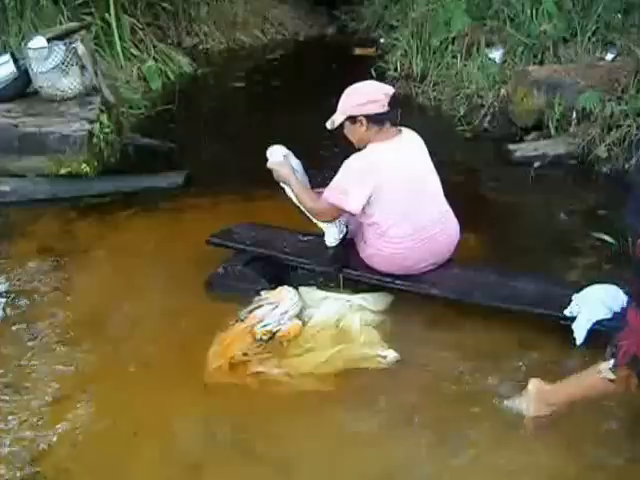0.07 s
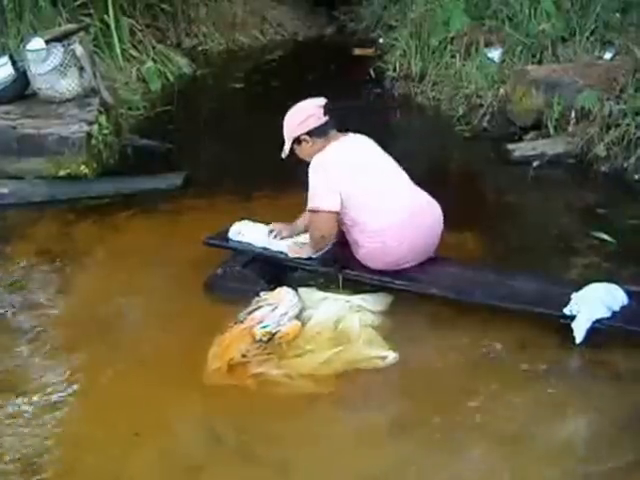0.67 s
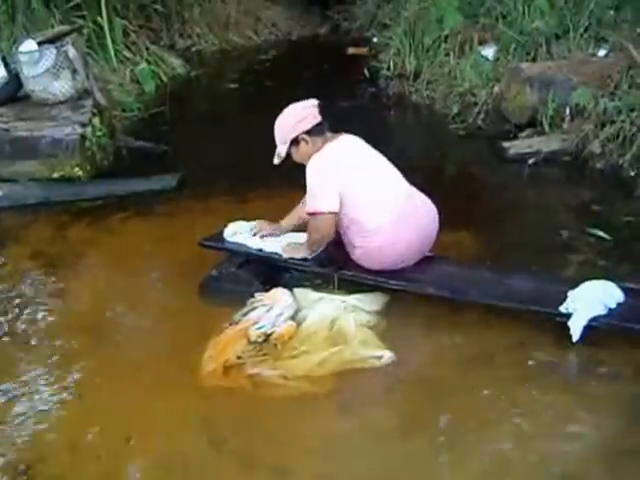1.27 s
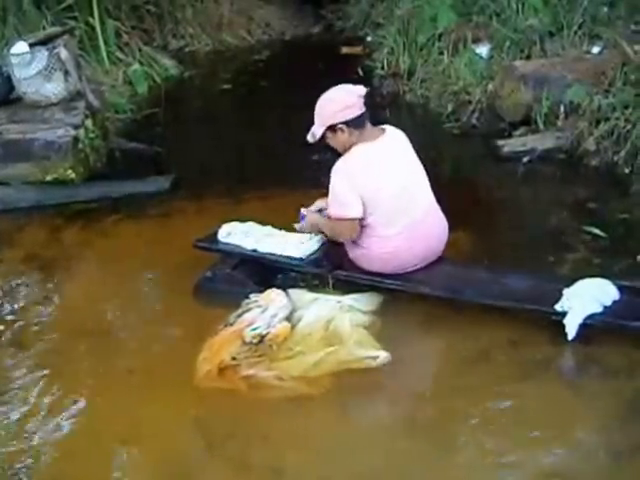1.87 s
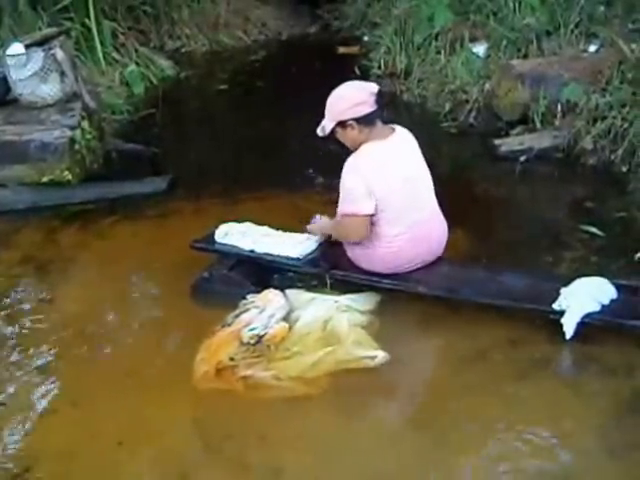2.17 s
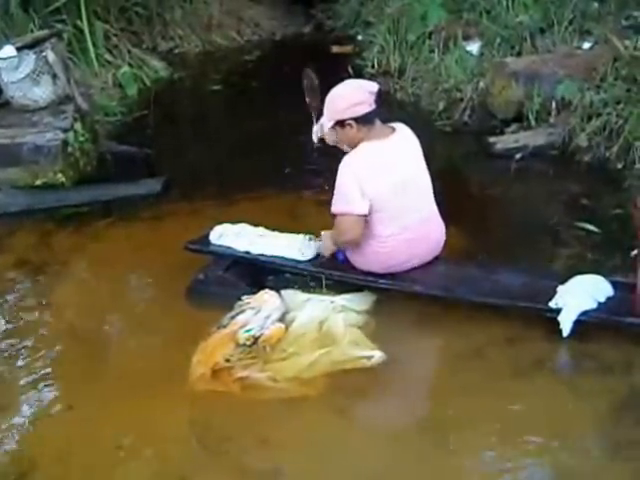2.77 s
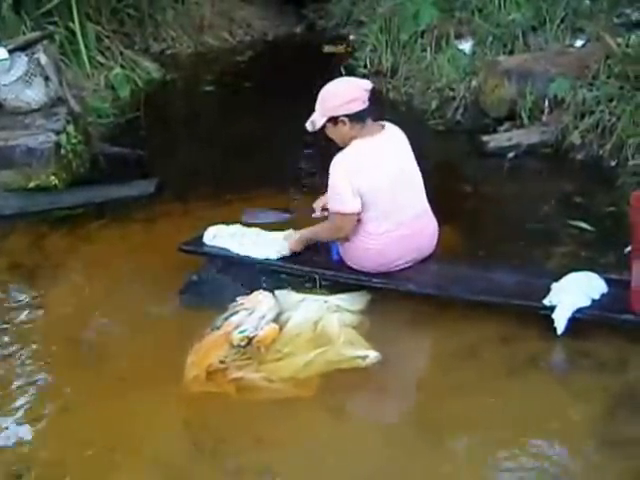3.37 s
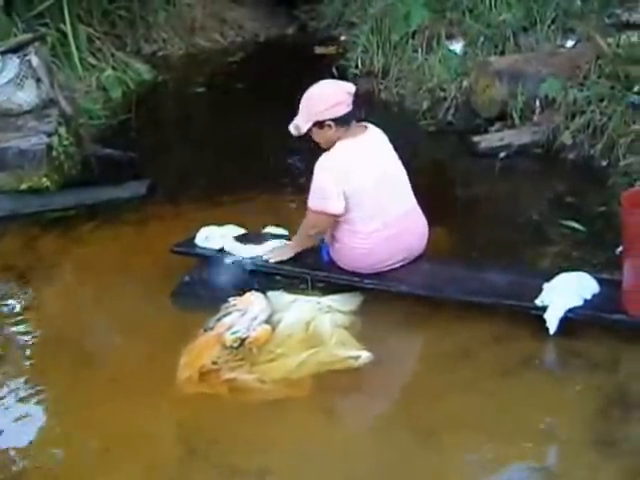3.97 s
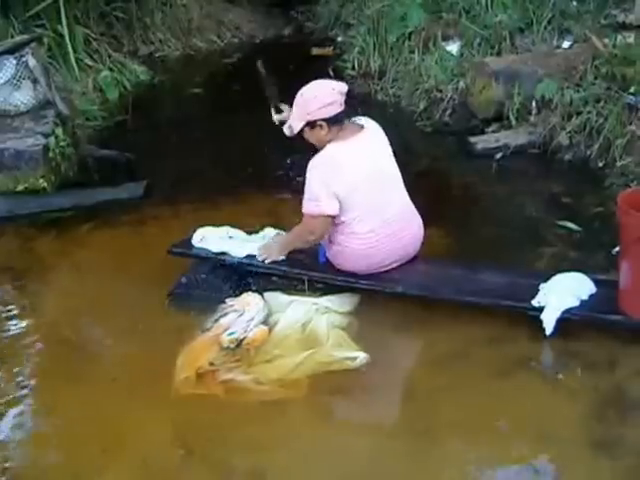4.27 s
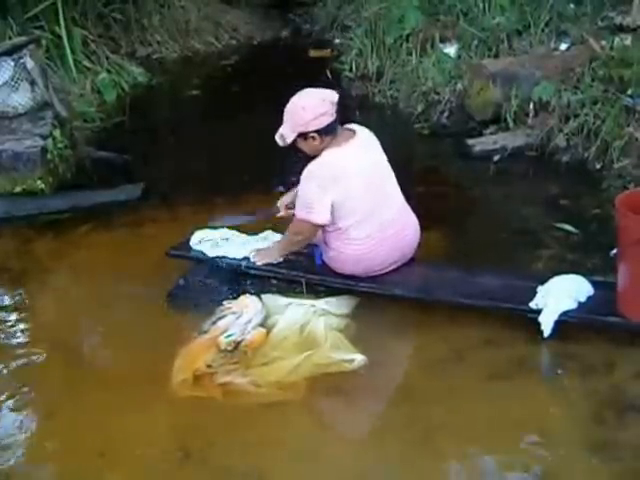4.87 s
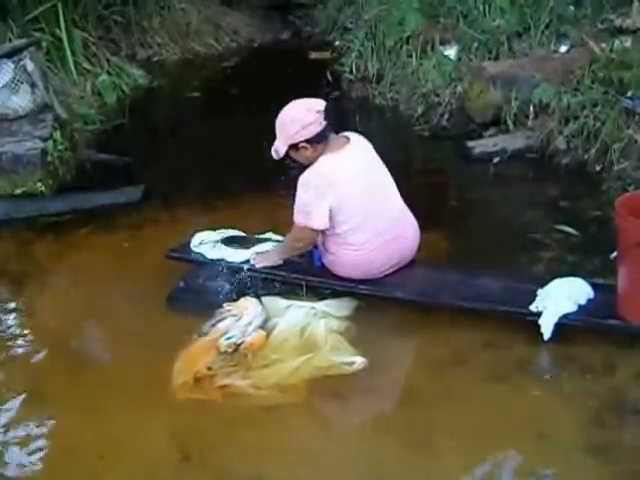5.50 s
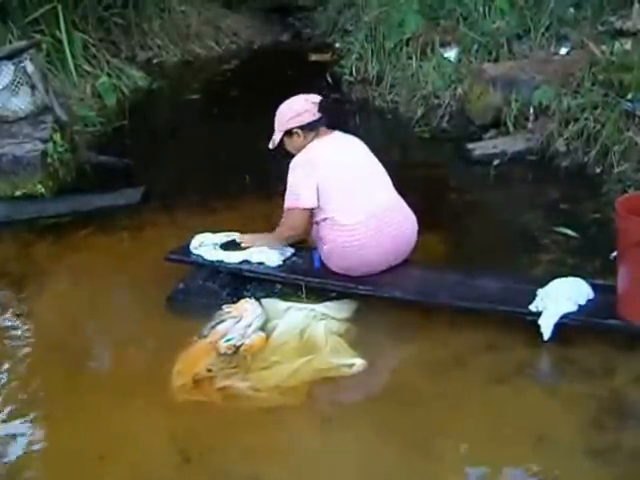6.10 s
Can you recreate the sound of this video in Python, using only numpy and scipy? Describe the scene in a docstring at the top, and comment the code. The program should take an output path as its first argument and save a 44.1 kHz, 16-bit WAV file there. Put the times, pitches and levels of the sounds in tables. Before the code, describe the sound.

Outdoors at a quietly running stream, water plinks and bubbles while wet laundry is slapped down and pressed on a plank. After a lull and a light wooden knock, a paddle beats the cloth four times at an even pace, the second blow weaker, with briefly ringing wood, spatter and a short echo off the banks. The lo-fi microphone distorts on the loud blows and catches faint wind rumble.

```python
"""A wooden paddle whacks wet cloth four times on a plank over a shallow stream: thump, crack, ringing wood
and spray. Before that, the cloth is laid down and kneaded with wet slaps and soft thuds, stirred water
bubbles, and the paddle knocks as it is picked up. The banks scatter each blow back, and a breeze nudges
the microphone of a small camera, whose gritty 8 kHz sound track overloads on the blows."""
import sys
import numpy as np
from scipy import signal
from scipy.fft import rfft, irfft
from scipy.io import wavfile

SR = 44100
rng = np.random.default_rng(int(sys.argv[2]) if len(sys.argv) > 2 else 0)


def store_wav(level_fs):
    """Save 16-bit WAV to argv[1]."""
    pcm = np.round(np.clip(np.atleast_2d(level_fs), -1, 1) * 32767)
    wavfile.write(sys.argv[1], SR, pcm.T.astype(np.int16))


N = 270774
TIME = np.arange(N) / SR
AGE = TIME[:SR // 2]   # time since the start of one event

# Table levels are relative: each layer adds its own shaping and trim.
# tone of the rushing stream: freq_hz, level_db
STREAM_SPECTRUM = [(35, -53), (60, -27), (75, -6), (102, -6), (184, -6), (314, -0.5), (393, -1),
                   (518, -3.5), (585, -6.5), (797, -3.5), (1050, -11), (3010, -13.5), (3700, -12),
                   (4810, -12), (8140, -120)]
# hands and feet stir the water: full_strength_at_s, hold_s, level_db
WATER_STIRS = [(.01, 0.095, -51.5), (.36, 0.11, -47), (.6, 0.2, -57.5), (1.2, .03, -45.5),
               (1.44, 0.051, -53.5), (2.04, 0.033, -56)]
# tone of tiny wet contacts, as coloured by the microphone: freq_hz, level_db
WET_SPECTRUM = [(150, 10), (500, -0.5), (950, 1.5), (1600, -16), (2400, -7), (3800, -11.5)]
# slaps of cloth and water: start_s, level_db, low_cut_hz, t60_s
WET_SLAPS = [(.064, -34, 1500, 0.03), (.143, -34.5, 700, 0.032), (0.397, -37.5, 252, 0.25),
             (.4340, -21, 182, 0.078), (.692, -40, 1100, 0.088), (.746, -34.5, 2500, 0.037),
             (1.004, -32, 920, 0.054), (5.319, -29, 597, 0.088), (5.623, -30.5, 545, 0.084)]
# the clearest bubbles: start_s, level_db, start_pitch_hz, t60_s
CLEAR_BUBBLES = [(.143, -32, 1150, 0.028), (.852, -32, 476, 0.072), (.879, -36, 2150, .038),
                 (.8924, -21, 2240, 0.012), (.894, -38, 718, 0.12), (1.005, -22, 1000, 0.024),
                 (1.006, -27.5, 1460, 0.015), (1.184, -37.5, 1014, 0.17), (1.192, -35, 1460, 0.031),
                 (1.203, -31.5, 748, 0.073), (1.215, -34.5, 1765, 0.062), (1.218, -35, 1030, 0.044),
                 (1.246, -33.5, 754, 0.056), (1.353, -38.5, 985, 0.047), (2.058, -39, 2050, 0.043)]
# cloth and hands land on the plank: start_s, level_db
SOFT_THUDS = [(0.404, -50), (0.434, -23.5), (.697, -35.5), (3.870, -34), (5.625, -27)]
# ringing modes of the plank: pitch_hz, level_db, t60_s
PLANK_MODES = [(144, -10.5, 0.067), (228, -1.5, 0.052), (311, -5, 0.042), (467.5, 3, 0.04),
               (615, -4.5, 0.055), (2204, -22.5, 0.049)]
# gusts at the microphone: full_strength_at_s, hold_s, level_db
BREEZE_GUSTS = [(0.573, .25, -49), (1.123, 0.39, -51), (4.352, 0.12, -44.5), (5.014, 0.292, -38.5),
                (5.8, .13, -44.5)]
# stronger eddies buffet the microphone: start_s, level_db, pitch_hz
EDDY_PUFFS = [(.636, -34, 44.7), (1.145, -36.5, 50.5), (1.24, -39, 44.6), (5.100, -32.5, 122),
              (5.136, -28, 40), (5.194, -29.5, 152)]
# light knocks of the paddle: start_s, level_db
PADDLE_KNOCKS = [(2.8574, -20), (2.8625, -17.5), (2.948, -33)]
# ringing modes of the paddle: pitch_hz, level_db, t60_s
PADDLE_MODES = [(381, -2, 0.035), (696, -4, 0.03), (879.6, -2, 0.037), (1027, -11, 0.031),
                (1900, -16, 0.048)]
# tone of the blade's contact, as heard: freq_hz, level_db
CRACK_SPECTRUM = [(150, -13), (400, 1.5), (900, 5), (1500, -12), (2400, 1.5), (3800, -13.5)]
# blows on the cloth: start_s, thump_db, thump_hz, crack_db, plank_db, paddle_db, spray_db
PADDLE_BLOWS = [(3.3852, 8.5, 303.5, -3, -4, -8, -19), (4.1378, -7.5, 200, -9, -31, -6, -27.5),
                (4.889, 10, 278.5, -5, -2.5, -3, -19.5), (5.6530, 6.5, 290, -8, -3.5, -1, -17.5)]
# tone of flying spray, as heard: freq_hz, level_db
SPRAY_SPECTRUM = [(100, 0.5), (300, -2), (600, -0.5), (900, 4.5), (1400, -11.5), (2400, -9), (3800, -8.5)]

RUNOFF_DB, TRICKLE_DB = -54, -61   # water shed at each blow; the trickle that never stops
BUBBLE_CLIMB_HZ_PER_S = 10200
CALM_DB = -55.5   # the breeze between gusts
SQUASH_S = .0075   # time the blade takes to flatten the cloth
TRACK_HZ, ANTIALIAS_HZ, CUTOFF_HZ, CLIP_LEVEL = 8000, 3750, 15600, .7


def from_db(db):
    """Decibels to gain."""
    return 10 ** (np.asarray(db) / 20)


def rms_one(x):
    """Scale to unit rms."""
    return x / np.sqrt(np.mean(x ** 2) + 1e-20)


def fade(t60):
    """Decay by 60 dB in t60 seconds; 1 - fade makes a soft attack."""
    return from_db(-60 * AGE / t60)


def swell(peak_s):
    """Rises to 1 at peak_s, then dies away."""
    return AGE / peak_s * np.exp(1 - AGE / peak_s)


def surge(s, hold_s, db, rise_db_per_s, fall_db_per_s):
    """Gain that climbs to db at time s, holds, then falls away."""
    before_s, after_s = np.maximum(s - TIME, 0), np.maximum(TIME - s - hold_s, 0)
    return from_db(db - rise_db_per_s * before_s - fall_db_per_s * after_s)


def add(track, s, sound):
    """Mix a sound into the track at time s."""
    at = round(s * SR)
    track[at:at + len(sound)] += sound[:N - at]


def cut(x, hz, kind, order=2):
    """Butterworth low- or high-pass."""
    return signal.sosfilt(signal.butter(order, hz, kind, fs=SR, output="sos"), x)


def coloured(x, spectrum):
    """EQ noise to a spectrum, with nothing above the sound track's band; rms 1."""
    hz = np.fft.rfftfreq(len(x), 1 / SR)
    at_hz, db = np.transpose(spectrum)
    gain = from_db(np.interp(np.log(hz + 1), np.log(at_hz), db)) * (hz < TRACK_HZ / 2)
    return rms_one(irfft(rfft(x) * gain, len(x)))


def grains(per_s, spread_db, size=len(AGE)):
    """Random clicks of uneven size."""
    clicks = (rng.random(size) < per_s / SR) * rng.standard_normal(size)
    return clicks * from_db(spread_db * rng.standard_normal(size))


def struck(modes, scatter_db):
    """Modes ring with strengths that depend on where the wood is hit."""
    ring = np.zeros(len(AGE))
    for k, (hz, db, t60) in enumerate(modes):
        strength = (-1) ** k * from_db(db + scatter_db * rng.standard_normal())
        ring += strength * np.sin(2 * np.pi * hz * AGE) * fade(t60)
    return ring


def stream():
    """Shallow running water lays a quiet, steady rush under everything."""
    return from_db(-50) * coloured(rng.standard_normal(N), STREAM_SPECTRUM)


def stirring():
    """Water wakes fast at each stroke or blow, then slowly settles to a trickle."""
    strokes = list(WATER_STIRS) + [(s, 0, RUNOFF_DB) for s, *_ in PADDLE_BLOWS]
    power = sum(surge(*stroke, rise_db_per_s=300, fall_db_per_s=64) ** 2 for stroke in strokes)
    return np.sqrt(power + from_db(TRICKLE_DB) ** 2)


def bubble(hz, t60):
    """A bubble rings and climbs in pitch, by an octave at most, as it nears the surface."""
    pitch_hz = np.minimum(hz + BUBBLE_CLIMB_HZ_PER_S * AGE, 2 * hz)
    return np.sin(2 * np.pi * np.cumsum(pitch_hz) / SR) * fade(t60) * (1 - fade(t60=0.0024))


def water():
    """A few clear bubbles over the fizz and small plinks of stirred water."""
    bubbles, plinks = np.zeros(N), np.zeros(N)
    for s, db, hz, t60 in CLEAR_BUBBLES:
        add(bubbles, s, from_db(db) * bubble(hz, t60))
    for hz in np.geomspace(700, 3600, num=16):
        plink = bubble(hz, t60=40 / hz)   # small bubbles die sooner
        plinks += signal.fftconvolve(grains(per_s=14, spread_db=5.5, size=N), plink)[:N]
    fizz = cut(coloured(grains(per_s=3500, spread_db=1, size=N), WET_SPECTRUM), 1190, "high")
    return bubbles + stirring() * (from_db(-4) * rms_one(plinks) + from_db(0.5) * rms_one(fizz))


def banks(x):
    """Rocks and leafy banks scatter sound back as a short, dense echo with little bass."""
    tail = rng.standard_normal(len(AGE)) * fade(t60=0.17) * (1 - fade(t60=0.081))
    echo = signal.fftconvolve(x, tail / np.linalg.norm(tail))[:N]
    return from_db(-15) * cut(echo, 330, "high")


def slaps():
    """Each slap is a quick burst of tiny wet contacts; small ones lack the lows."""
    out = np.zeros(N)
    for s, db, low_cut_hz, t60 in WET_SLAPS:
        contacts = coloured(grains(per_s=11000, spread_db=2.5), WET_SPECTRUM)
        burst = rms_one(cut(contacts, low_cut_hz, "high"))
        add(out, s, from_db(db + 1) * burst * fade(t60) * (1 - fade(t60=0.01)))
    return out


def thuds():
    """Cloth and hands land softly and set the plank ringing quietly."""
    out = np.zeros(N)
    for s, db in SOFT_THUDS:
        add(out, s, from_db(db) * struck(PLANK_MODES, scatter_db=0.5) * (1 - fade(t60=0.023)))
    return out


def breeze():
    """Eddies bump against the microphone in an uneven rumble; stronger gusts add faster flutter."""
    gusts = [surge(*gust, rise_db_per_s=260, fall_db_per_s=240) for gust in BREEZE_GUSTS]
    gust_db = 20 * np.log10(np.maximum(np.max(gusts, axis=0), from_db(CALM_DB)))
    rumble = rms_one(cut(cut(rng.standard_normal(N), 40.8, "low"), 23.6, "high"))
    flutter = rms_one(cut(cut(rng.standard_normal(N), 204, "low", order=4), 51, "high"))
    flutter_db = np.minimum(1.3 * (gust_db + 33), 0)
    wobble = rms_one(cut(rng.standard_normal(N), 18, "low"))
    eddies = rms_one(from_db(5 * np.tanh(wobble)))
    return from_db(gust_db) * eddies * (rumble + from_db(flutter_db) * flutter)


def puffs():
    """A single eddy pushes and pulls the diaphragm once or twice."""
    out = np.zeros(N)
    for s, db, hz in EDDY_PUFFS:
        add(out, s, from_db(db) * np.sin(2 * np.pi * hz * AGE) * swell(peak_s=0.0066) ** 2)
    return out


def knocks():
    """The paddle bumps as it is lifted and handled; a soft contact favours its lowest mode."""
    out = np.zeros(N)
    for s, db in PADDLE_KNOCKS:
        ring = cut(struck(PADDLE_MODES, scatter_db=0), 940, "low", order=1)
        tick = coloured(rng.standard_normal(len(AGE)), CRACK_SPECTRUM) * fade(t60=0.039)
        add(out, s, from_db(db) * (ring + from_db(-21) * tick))
    return out


def blows():
    """The blade cracks on the wet cloth, drives the air out of it, shakes the wood and throws spray."""
    out = np.zeros(N)
    for s, thump_db, thump_hz, crack_db, plank_db, paddle_db, spray_db in PADDLE_BLOWS:
        # the flat blade's air pulse swings only a few times
        thump = -np.sin(2 * np.pi * thump_hz * AGE) * swell(peak_s=.0038) ** 3
        crack = coloured(rng.standard_normal(len(AGE)), CRACK_SPECTRUM) * swell(peak_s=0.0029) ** 1.11
        blade = struck(PADDLE_MODES, scatter_db=3) * (1 - fade(t60=0.052)) ** 2
        droplets = coloured(grains(per_s=6000, spread_db=1), SPRAY_SPECTRUM)
        spray = cut(droplets * fade(t60=0.24) * (1 - fade(t60=0.02)), 135, "high")
        add(out, s, from_db(thump_db) * thump + from_db(crack_db) * crack
            + from_db(paddle_db + 8.5) * blade + from_db(spray_db + 4) * spray)
        # the plank takes the blow only once the cloth is squashed flat
        plank = struck(PLANK_MODES, scatter_db=4) * (1 - fade(t60=0.009))
        add(out, s + SQUASH_S, from_db(plank_db - 3) * plank)
    return out


def scene():
    """The washing and its echo up front, over a bed of stream and wind; mono."""
    washing = blows() + thuds() + knocks() + slaps() + water()
    rush = stream()
    foreground = cut(washing + banks(washing), 50, "high")
    return (foreground + rush + breeze() + puffs())[None, :]


def record(dry):
    """Sampled at 8 kHz and clipped; each sample is held, which mirrors the sound into a gritty treble."""
    narrow = cut(dry[0], ANTIALIAS_HZ, "low", order=16)
    held = np.interp(np.floor(TIME * TRACK_HZ) / TRACK_HZ, TIME, narrow)
    clipped = np.clip(held, -CLIP_LEVEL, CLIP_LEVEL)
    top_cut = signal.firwin(201, CUTOFF_HZ, fs=SR)
    return signal.fftconvolve(clipped, top_cut, "same")[None, :]


dry = scene()
out = record(dry)
store_wav(out)
```